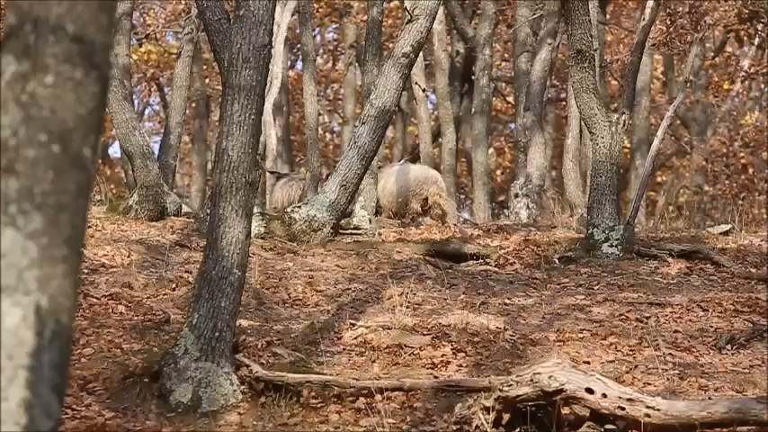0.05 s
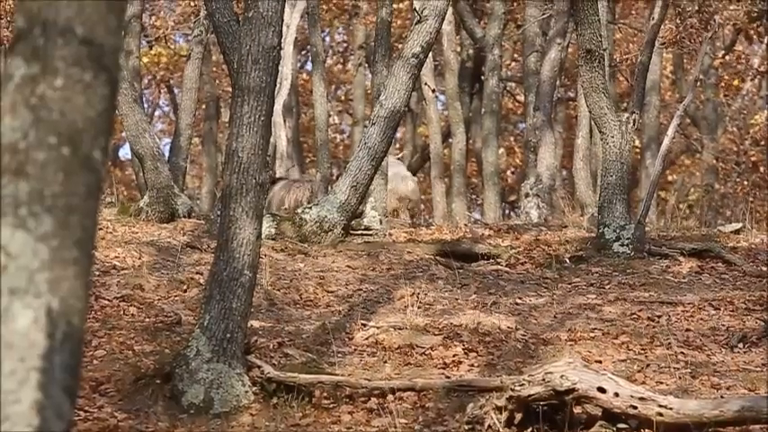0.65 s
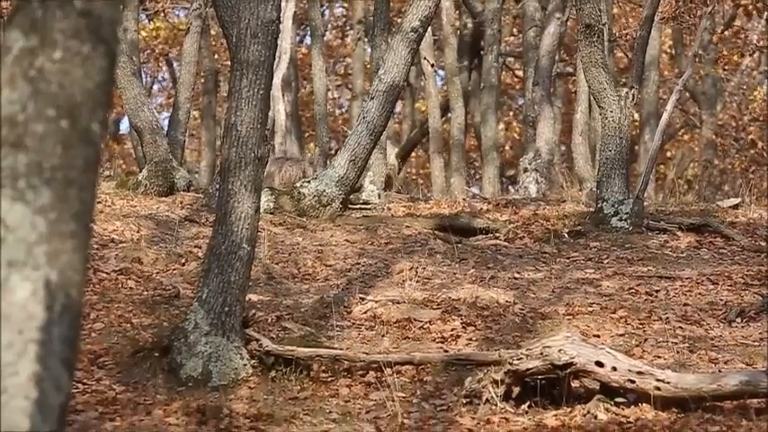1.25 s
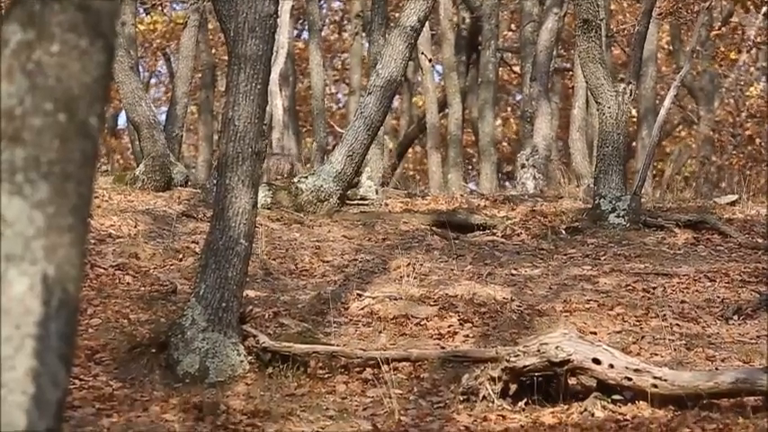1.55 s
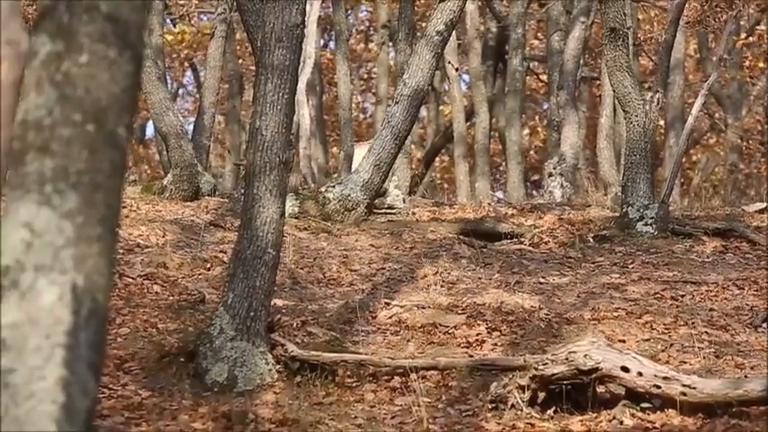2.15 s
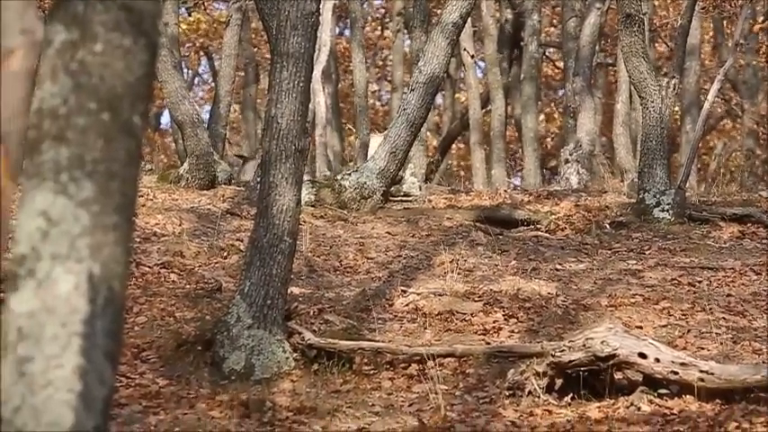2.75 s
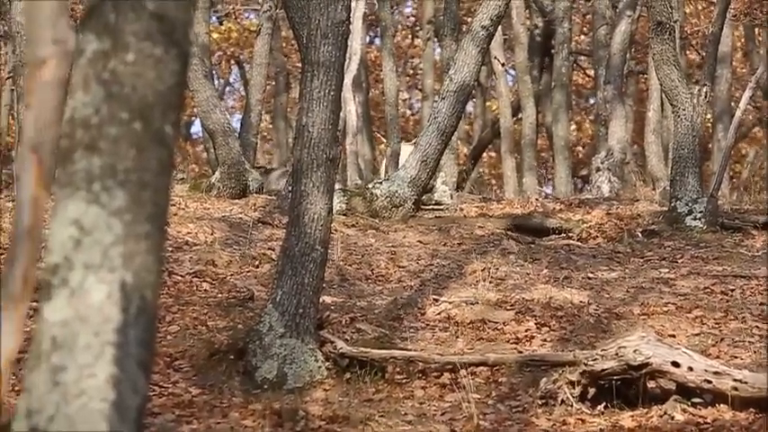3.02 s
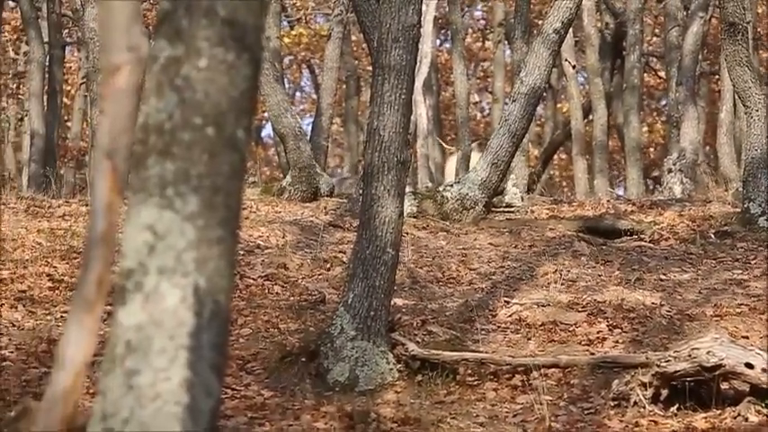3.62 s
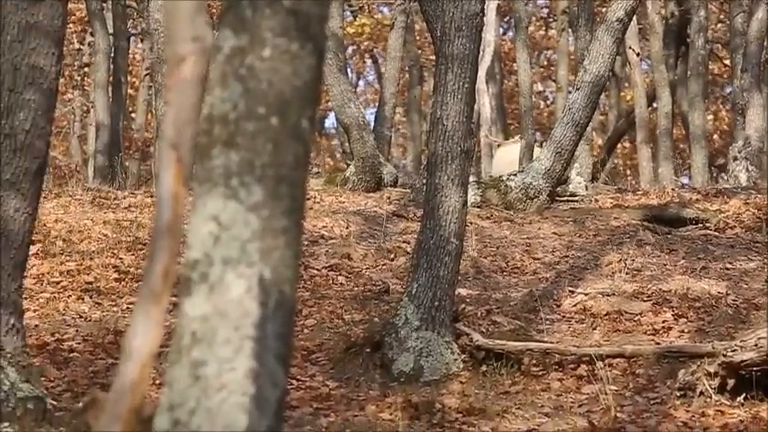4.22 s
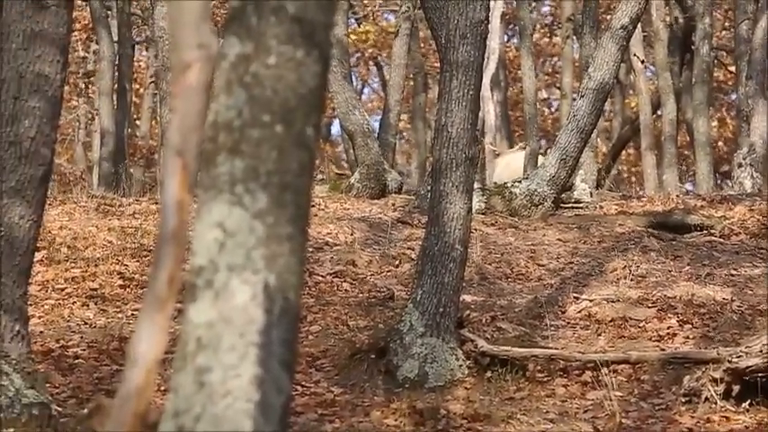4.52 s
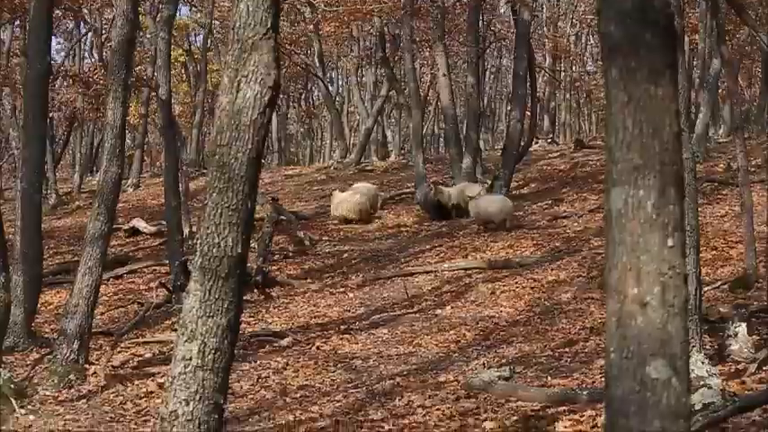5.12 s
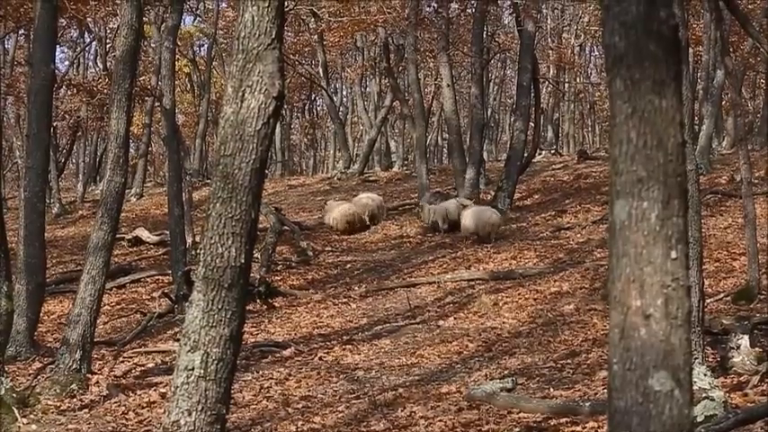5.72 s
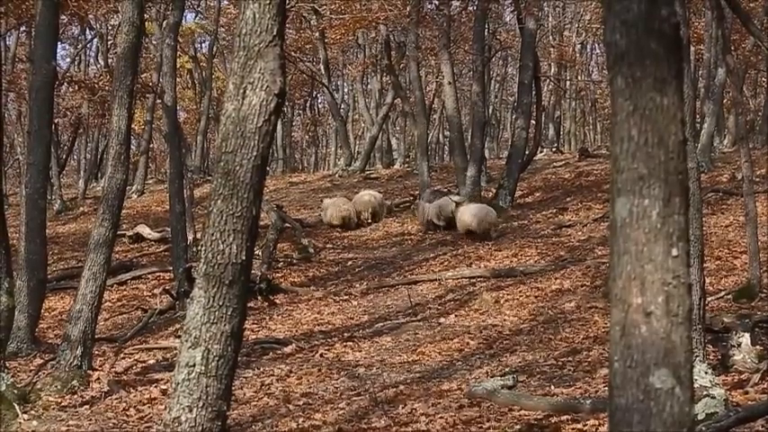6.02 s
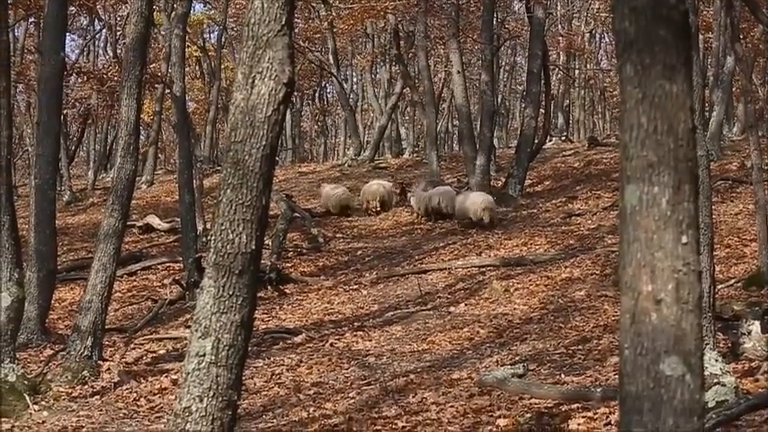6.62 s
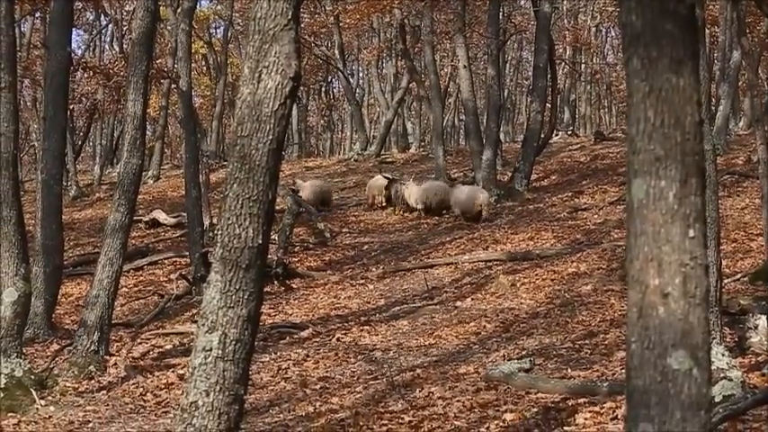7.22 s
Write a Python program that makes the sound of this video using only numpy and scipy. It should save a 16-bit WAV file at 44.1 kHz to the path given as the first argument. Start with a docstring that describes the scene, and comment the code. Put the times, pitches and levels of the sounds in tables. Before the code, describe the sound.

From the start, a steady hiss of dry leaves and the soft roar of distant treetops fill a wood, while wind rumbles on the microphone and strikes it with irregular low thumps. Strong bumps land near 1.4 and 2.2 seconds, and the heaviest cluster comes at about 2.8 seconds. The buffeting weakens after 4 seconds, and everything cuts to a brief silence just before 5 seconds.

A sheltered place follows, with a softer hiss and small leaf ticks. From about 5.2 to 7 seconds, distant sheep make faint, short crunches in the leaf litter. Two soft wind thumps touch the microphone near 5.5 seconds. One very high, faint bird whistle slips by around 6.7 seconds, followed by a sharp twig snap at 6.8 and a dull hoof knock on a log with a smaller crack. The gentle rustle continues to the end, at about 7.5 seconds.

```python
"""Wind thumps on the microphone over the hiss of dry leaves in an autumn wood.
Far crowns roar, nearer leaves tick, and the passing air rumbles and strikes in eddies.
After a short silence comes a sheltered place: a softer hiss, two faint thumps, far sheep
shuffling in the leaf litter, a twig snap, a hoof on a log and one thin bird call."""
import sys
import numpy as np
from scipy import signal
from scipy.fft import rfft, irfft, next_fast_len
from scipy.io import wavfile
from scipy.ndimage import map_coordinates

SR = 44100
rng = np.random.default_rng(int(sys.argv[2]) if len(sys.argv) > 2 else 0)


def wav_record(signal):
    """Record a signal, one row per channel, as 16-bit PCM in the file named by sys.argv[1]."""
    frames = np.transpose(np.atleast_2d(signal))
    bounded = np.clip(frames, -1, 1)
    # unit amplitude maps onto the largest positive 16-bit level
    quanta = np.round(bounded * 32767).astype(np.int16)
    wavfile.write(sys.argv[1], SR, quanta)


N = 320166
EXPOSED_END_S, SHELTERED_START_S = 4.871, 5.002


def amp(db):
    """Decibels to gain."""
    return 10 ** (np.asarray(db) / 20)


def unit(x):
    """x at rms 1."""
    return x / np.sqrt(np.mean(x ** 2) + 1e-20)


def clock():
    """The time of every sample, in seconds."""
    return np.arange(N) / SR


def curves(rows):
    """One automation curve for each column after the time."""
    times, *columns = np.transpose(rows)
    return [np.interp(clock(), times, column) for column in columns]


def wobble(rate):
    """A smooth random curve, rate knots a second."""
    return map_coordinates(rng.standard_normal(int(N * rate / SR) + 4), [clock() * rate])


def filtered(x, response):
    """x through an EQ whose gain is response(hz)."""
    size = x.shape[-1]
    padded = next_fast_len(size + 8192)
    gain = response(np.fft.rfftfreq(padded, 1 / SR))
    return irfft(rfft(x, padded) * gain, padded)[..., :size]


def coloured(x, eq):
    """x shaped by (Hz, dB) points, at rms 1."""
    points_hz, db = np.transpose(eq)
    return unit(filtered(x, lambda hz: amp(np.interp(np.log(hz + 1), np.log(points_hz), db))))


def band(x, centre_hz, octaves):
    """x through a bell on the log-frequency axis."""
    return filtered(x, lambda hz: np.exp(-.5 * (np.log2((hz + 1) / centre_hz) / octaves) ** 2))


def leaf_ticks(rate, spread_db):
    """Countless leaves touching, rate a second, a few harder than the rest."""
    hits = rng.random(N) < rate / SR
    strength = amp(spread_db * np.minimum(rng.exponential(size=N), 5))
    return unit(hits * strength * rng.standard_normal(N))


def trees(roar_eq, leaf_eq, roar_db, hiss_db, ticks_db, flutter_db):
    """Far crowns merge into a roar; nearer leaves hiss and tick as they flutter."""
    roar = coloured(rng.standard_normal(N), roar_eq) * amp(roar_db + 0.58 * wobble(8))
    rustle = rng.standard_normal(N) + amp(ticks_db) * leaf_ticks(rate=900, spread_db=1.5)
    hiss = coloured(rustle, leaf_eq) * amp(hiss_db + flutter_db * wobble(18))
    return roar + hiss


# Tone of the far roar and the near leaves in shelter. Each row: frequency in Hz, gain in dB.
SHELTERED_ROAR_EQ = [(20, -18), (40, -1), (68, 6), (120, 0), (280, -1), (420, -4), (600, -3.5),
                     (1000, -6.5), (1700, -9.5), (3000, -15), (8000, -57)]
SHELTERED_LEAF_EQ = [(300, -53), (1000, -18), (2100, -3), (3500, 0), (5500, -1.5), (7500, -6),
                     (10000, -11.5), (13000, -16), (15700, -20)]


def sheltered_crowns():
    """In shelter the wind is a soft, steady bed, with the leaf ticks further forward."""
    return trees(SHELTERED_ROAR_EQ, SHELTERED_LEAF_EQ,
                 roar_db=-49.5, hiss_db=-53, ticks_db=-8.0, flutter_db=0.8)


# Tone of the far roar and the near leaves in the open. Each row: frequency in Hz, gain in dB.
EXPOSED_ROAR_EQ = [(20, -10.5), (70, 6), (150, 3.5), (280, 0), (450, -2.5), (700, -3), (1100, -6),
                   (1700, -10), (3000, -20.5), (8000, -74)]
EXPOSED_LEAF_EQ = [(300, -25), (1000, -3.5), (1700, -4.5), (2200, 0.5), (3500, 0), (6000, -2.5), (7500, -6),
                   (10000, -13.5), (13000, -21), (15700, -25.5)]
# Wind in the crowns. Each row: time in seconds, roar fader in dB, hiss fader in dB.
CROWN_FADERS = [(0.0, -49.5, -47), (2.37, -49.5, -48), (4.21, -48.5, -46), (4.65, -48.5, -46)]


def exposed_crowns():
    """Crowns open to the wind make a louder bed that lifts slightly towards its end."""
    roar_db, hiss_db = curves(CROWN_FADERS)
    return trees(EXPOSED_ROAR_EQ, EXPOSED_LEAF_EQ,
                 roar_db + 5.0, hiss_db + 1.0, ticks_db=-15.5, flutter_db=0.25)


def trunk_echo(dry, wet_db, t60):
    """The trunks scatter a weak, short tail after each sound."""
    t = np.arange(SR // 2) / SR
    tail = rng.standard_normal(len(t)) * amp(-60 * t / t60)
    return dry + amp(wet_db) * signal.fftconvolve(dry, tail / np.linalg.norm(tail))[:N]


# The glide of the call. Each row: time in seconds, pitch in Hz.
BIRD_GLIDE = [(6.65, 9300), (6.671, 7250), (6.687, 7900), (6.71, 8000)]


def bird(loudest_s, level_db):
    """One thin whistle that swells fast, slides down and lifts again as it fades."""
    hz, = curves(BIRD_GLIDE)
    t = clock() - loudest_s
    width_s = np.where(t < 0, .007, .02)  # attack, release
    swell = np.exp(-.5 * (t / width_s) ** 2)
    return amp(level_db) * swell * np.sin(2 * np.pi * np.cumsum(hz) / SR)


# Hooves in the litter. Each row: midpoint in seconds, level in dB before trim, centre in Hz,
# width in octaves, half length in seconds.
HOOF_STEPS = [(5.236, -53.5, 3580, 0.95, .009), (5.33, -62, 7500, .4, 0.018), (5.465, -59, 6000, .6, .008),
              (5.61, -56, 6000, 0.55, .025), (6.11, -57, 5500, 0.39, .03), (6.289, -54.5, 2400, .8, 0.0065),
              (6.45, -61, 7500, 0.5, 0.019), (6.623, -52, 1150, .6, 0.0077), (6.93, -56, 730, .55, 0.058)]


def sheep_steps(trim_db):
    """Each step crushes a patch of dry leaves into a short, dense cloud of ticks."""
    out = np.zeros(N)
    for middle_s, db, hz, octaves, half_s in HOOF_STEPS:
        crunch = unit(band(leaf_ticks(rate=6000, spread_db=1.2), hz, octaves))
        swell = np.exp(-.5 * ((clock() - middle_s) / half_s) ** 2)
        out += amp(db + trim_db) * crunch * swell
    return out


# The ring of a fallen log. Each row: pitch in Hz, level in dB, seconds to fall 60 dB.
LOG_MODES = [(171, -38, 0.025), (247, -32, 0.058), (740, -49, .12)]


def hoof_on_log(start_s):
    """A hoof knocks the log, which rings dully in a few low modes."""
    t = np.maximum(clock() - start_s, 0)
    return sum(amp(db - 60 * t / t60) * np.sin(2 * np.pi * hz * t) for hz, db, t60 in LOG_MODES)


# Twigs and leaf stalks breaking. Each row: start in seconds, peak in dB before trim, centre in Hz,
# width in octaves, seconds to fall 60 dB.
TWIG_SNAPS = [(5.218, -37, 9000, 0.19, .004), (6.778, -20, 2900, 1, 0.001),
              (6.8682, -30.5, 2000, 0.82, .002)]


def twigs(trim_db):
    """A snap is a sharp release followed by a few fibres tearing."""
    out = np.zeros(N + SR)
    t = np.arange(-SR // 100, SR // 20) / SR
    release = 10 * (t == 0)
    for start_s, db, hz, octaves, t60 in TWIG_SNAPS:
        tear = (t >= 0) * amp(-60 * np.abs(t) / t60) * rng.standard_normal(len(t))
        snap = band(release + tear, hz, octaves)
        first = round((start_s + t[0]) * SR)
        out[first:][:len(t)] += amp(db + trim_db) * snap / np.abs(snap).max()
    return out[:N]


# Air flowing over the microphone. Each row: time in seconds, strength in dB.
AIR_FLOW = [(0.0, -39), (0.13, -43.5), (0.36, -37.5), (0.57, -35), (1.14, -43), (1.58, -34.5), (1.83, -38),
            (2.15, -34), (2.29, -41.5), (2.52, -43.5), (2.84, -25.5), (3.02, -30), (3.24, -35.5),
            (3.39, -39.5), (4.08, -50.5), (4.65, -40)]
# Tone of its rumble. Each row: frequency in Hz, gain in dB.
RUMBLE_EQ = [(12, -14), (25, -6), (50, 0), (85, 1.5), (130, -6), (200, -15), (320, -25), (500, -33.5),
             (1000, -68)]


def rumble(trim_db, lumps_db, follows):
    """Turbulence at the microphone swells in lumps and follows a share of each swing in the flow."""
    flow_db, = curves(AIR_FLOW)
    gust_db = follows * (flow_db - flow_db.mean())
    lumps = amp(lumps_db * wobble(24.09))
    turbulence = unit(coloured(rng.standard_normal(N), RUMBLE_EQ) * lumps)
    return amp(flow_db.mean() + gust_db + trim_db) * turbulence


def small_eddy_rows(per_second, over_flow_db, spread_db, centre_hz, spread_octaves, whirl_db):
    """Cues for weaker eddies that arrive by chance; the faster the air, the harder they strike."""
    count = int(per_second * EXPOSED_END_S)
    times = (np.arange(count) + rng.random(count)) / per_second
    strength, pitch = rng.uniform(-1.34, 1, (2, count))
    levels_db = np.interp(times, *np.transpose(AIR_FLOW)) + over_flow_db + spread_db * strength
    centres_hz = centre_hz * 2 ** (spread_octaves * pitch)
    return [(s, db, hz, whirl_db) for s, db, hz in zip(times, levels_db, centres_hz)]


# The main thumps on the microphone; the last two land in shelter. Each row: midpoint in seconds,
# level in dB before trim, centre in Hz, lowest whirl's level in dB against the main swing.
STRONG_EDDIES = [(0.071, -22, 134, -14), (0.244, -23, 109, -13), (0.399, -13.5, 107, -13.5),
                 (0.427, -13, 189, -8), (0.507, -16.5, 159, -7), (0.736, -18.5, 138, -10),
                 (0.883, -17, 137, -14.5), (0.962, -18.5, 115, -16), (1.381, -8.5, 181, -12),
                 (1.51, -20, 104, -9), (1.613, -19, 171, -15), (1.764, -16.5, 162, -10),
                 (1.816, -21, 148, -14), (2.162, -21, 200, -6), (2.181, -10.5, 112, -8),
                 (2.236, -16, 149, -2), (2.474, -23.5, 104, -11), (2.509, -16.5, 122, -12.5),
                 (2.651, -19, 93, -11), (2.7, -20.5, 280, -5.5), (2.754, -11, 150, -8.5),
                 (2.775, -5.5, 199, -10), (2.861, -10.5, 211, -10.5), (2.949, -13, 142, -6.5),
                 (2.981, -16.5, 177, -6.5), (3.15, -19, 98, -3), (3.178, -19, 215, -5.5),
                 (3.23, -21.5, 145, -11), (3.389, -12.5, 153, -16), (3.638, -20, 135, -5),
                 (3.801, -20.5, 103, -13), (4.184, -27, 125, -10), (4.336, -26, 135, -6.5),
                 (4.7, -26, 120, -9), (4.73, -23, 130, -10), (5.463, -24, 104.6, -20),
                 (5.492, -29.5, 111, -19)]


def eddies(rows, trim_db):
    """Each eddy is one rounded pressure swing; smaller, faster, weaker whirls break off around it."""
    half_cycles, skew_rad = 0.3, 0.76
    scatter_s, reach_octaves, fall_db_per_octave = 0.00696, 1.4, 6  # the whirls
    out = np.zeros(N + SR)
    t = np.arange(-SR // 20, SR // 20) / SR

    def swing(delay_s, hz, phase):
        """A cycle or so that swells and fades."""
        turns = hz * (t - delay_s)
        return np.cos(2 * np.pi * turns + phase) / np.cosh(np.clip(turns / half_cycles, -20, 20))

    for middle_s, db, hz, whirl_db in rows:
        puff = swing(0, hz, skew_rad * rng.standard_normal())
        for octaves in np.linspace(0, reach_octaves, 10):
            offset, phase = rng.standard_normal(2)
            whirl = swing(scatter_s * offset, hz * 2 ** octaves, np.pi * phase)
            puff += amp(whirl_db - fall_db_per_octave * octaves) * whirl
        first = max(0, round((middle_s + t[0]) * SR))
        out[first:][:len(t)] += amp(db + trim_db) * puff
    return out[:N]


def scene():
    """The exposed place, a silence, then the sheltered place; both channels carry the same sound."""
    exposed = exposed_crowns()
    small_eddies = small_eddy_rows(per_second=14, over_flow_db=8, spread_db=5,
                                   centre_hz=130, spread_octaves=0.52, whirl_db=-10)
    exposed += rumble(trim_db=0.9, lumps_db=3.5, follows=0.83)
    exposed += eddies(small_eddies, trim_db=-0.5)

    sheltered = sheltered_crowns()
    sheep = twigs(trim_db=0.5) + sheep_steps(trim_db=2.5) + hoof_on_log(start_s=6.8685)
    call = bird(loudest_s=6.666, level_db=-55.5)
    sheltered += trunk_echo(sheep + call, wet_db=-15, t60=0.48)

    mix = exposed * (clock() < EXPOSED_END_S) + sheltered * (clock() > SHELTERED_START_S)
    mix += eddies(STRONG_EDDIES, trim_db=-1.0)
    return np.array([mix, mix])


def record(dry):
    """A brick-wall low-pass takes off the very top of the hiss."""
    return filtered(dry, lambda hz: hz < 15750)


dry = scene()
out = record(dry)
wav_record(out)
```